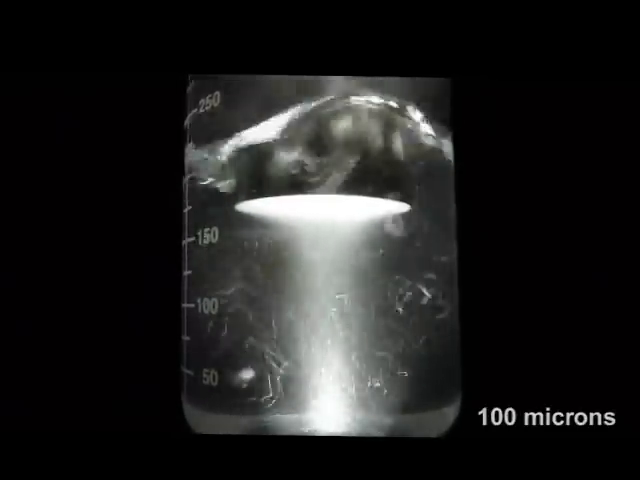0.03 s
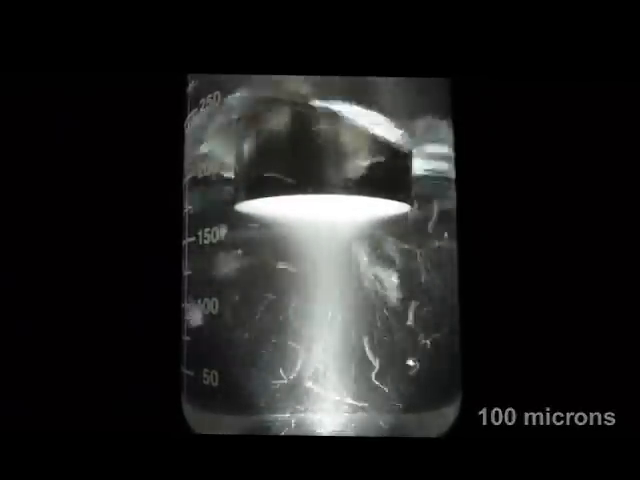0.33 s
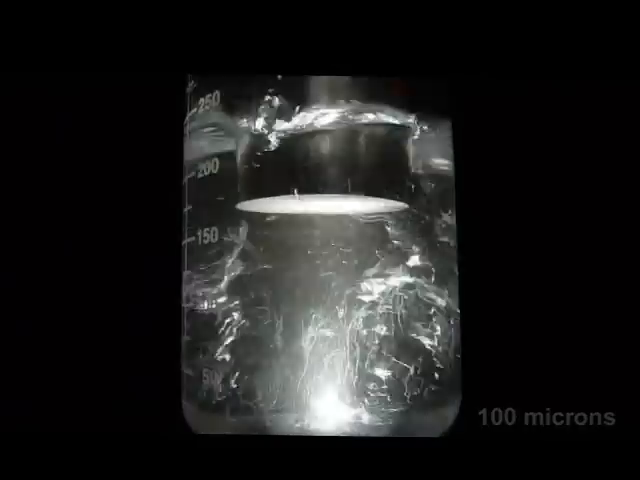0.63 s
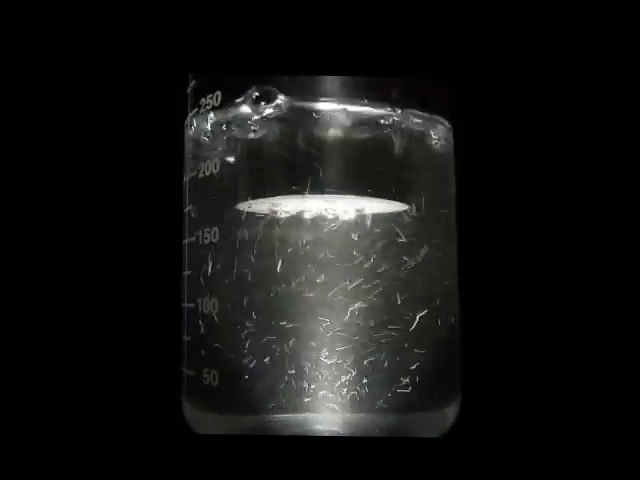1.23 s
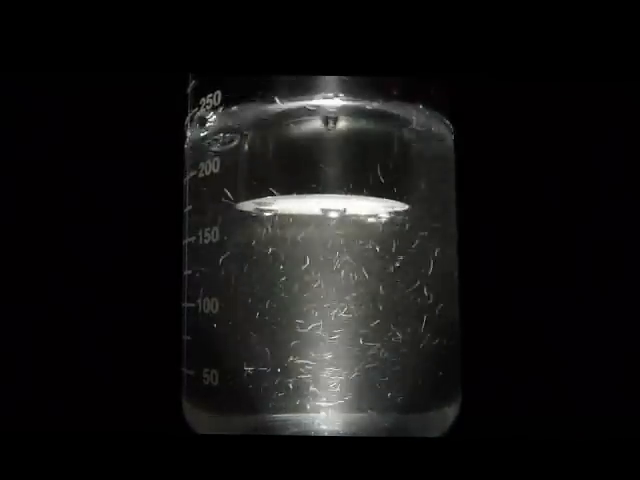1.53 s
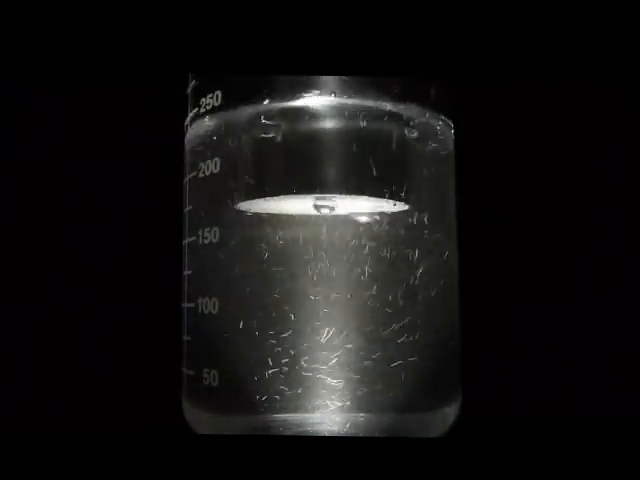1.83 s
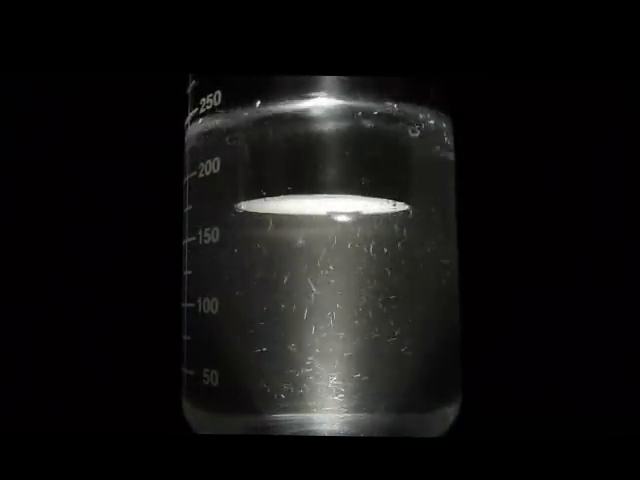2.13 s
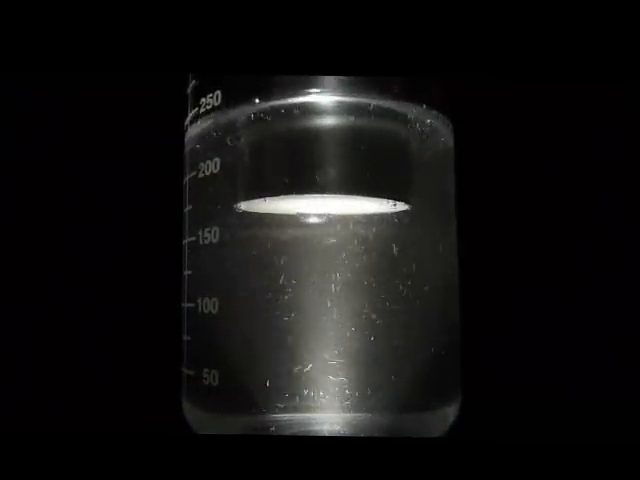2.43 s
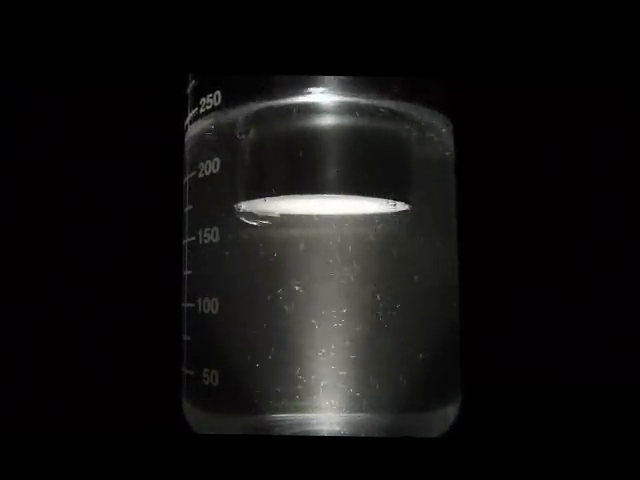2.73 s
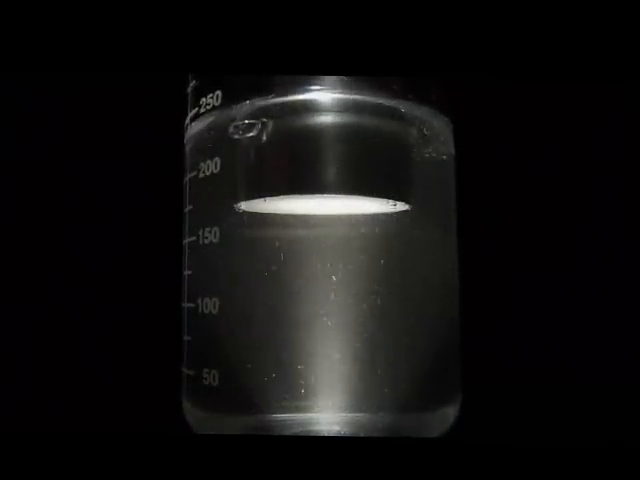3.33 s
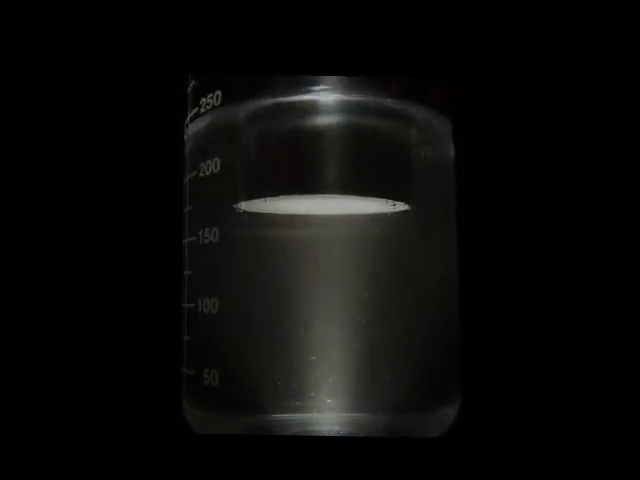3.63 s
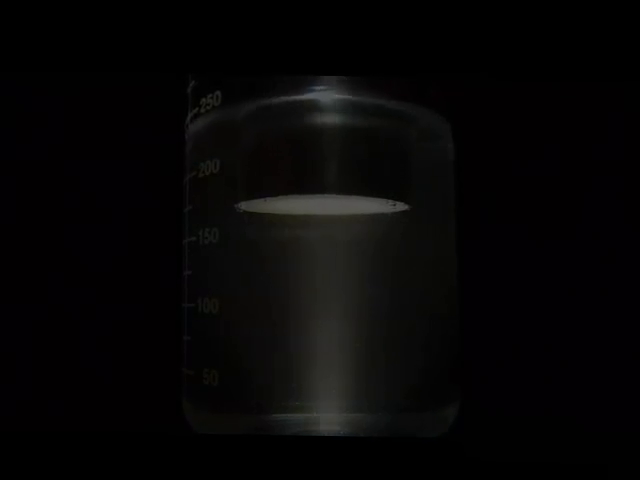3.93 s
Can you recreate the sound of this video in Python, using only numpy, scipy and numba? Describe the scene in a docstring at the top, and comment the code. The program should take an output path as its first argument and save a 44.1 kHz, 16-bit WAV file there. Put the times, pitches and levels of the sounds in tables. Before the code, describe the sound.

A loud hiss of water fizzing in a beaker stops abruptly, leaving low ventilation rumble.

```python
"""An ultrasonic horn shakes water in a glass beaker, so tiny bubbles form and collapse in a loud hiss with two
wandering pitches. The hiss jumps and a faint tick sounds, then the hiss starts to whistle. The horn cuts out
and the beaker rings briefly. The recorder's automatic volume recovers, bringing up the rumble of the room's
ventilation. One sharp click sounds nearby, and at the end the volume steps down. The recorder passes little
above 5 kHz."""
import sys
import numpy as np
from scipy import signal
from scipy.fft import rfft, irfft
from scipy.io import wavfile
from numba import njit

SR = 44100
rng = np.random.default_rng(int(sys.argv[2]) if len(sys.argv) > 2 else 0)


def waveform_to_disk(signal):
    """Save audio, clipped to [-1, 1], as 16-bit WAV at the path in sys.argv[1]."""
    frames = np.transpose(np.atleast_2d(signal))
    scaled = np.clip(frames, -1, 1) * 32767
    samples = np.round(scaled).astype(np.int16)
    wavfile.write(sys.argv[1], SR, samples)


N = 176400
T = np.arange(N) / SR

# The bubble cloud's lower and upper resonance (a pitch it favours): time_s, level_db, pitch_hz
LOW_CLOUD_PATH = [(0, -9.5, 1300), (.05, -13, 1265), (.085, -7, 1274), (.14, -8, 1254), (.168, -3, 1227),
                  (.195, -8.5, 1192), (.28, -7.5, 1180), (.335, -12.5, 1145), (.37, -9.5, 1106),
                  (.395, -11.5, 1150), (.44, -10, 1160), (.47, -6.5, 1077), (.502, -13.5, 1072),
                  (.517, -2, 1400), (.54, -5, 1390), (.58, -15, 1425), (.64, -13.5, 1457), (.67, -10, 1330),
                  (.703, -2, 1289), (.73, -7, 1303)]
HIGH_CLOUD_PATH = [(0, -2.5, 1520), (.04, -7, 1440), (.065, -10.5, 1396), (.087, -6, 1410),
                   (.13, -9.5, 1453), (.175, -6, 1390), (.2, -9, 1400), (.228, -5.5, 1425),
                   (.27, -9.5, 1506), (.31, -9.5, 1540), (.345, -5.5, 1516), (.385, -12.5, 1420),
                   (.428, -8, 1587), (.505, -8, 1566), (.525, -5, 1580), (.538, 0.5, 1667),
                   (.555, -7, 1640), (.635, -10, 1680), (.655, -5, 1430), (.677, -6, 1396),
                   (.703, -7, 1457), (.72, -3, 1640)]
# Loudness of the fizzing bubbles and of the churning water: time_s, level_db
FIZZ_LOUDNESS = [(0, -6), (.25, -9), (.5, -10.5), (.53, -12), (.58, -10), (.64, -11), (.73, -9.5)]
CHURN_LOUDNESS = [(0, -15.5), (.07, -13.5), (.1, -16.5), (.15, -11.5), (.18, -18.5), (.26, -23.5),
                  (.31, -12.5), (.37, -12), (.415, -22.5), (.45, -17), (.5, -13.5), (.55, -17.5),
                  (.61, -19), (.68, -16), (.715, -12.5)]
# Tone colour (how strong each pitch is) of the fizz and of the churning: pitch_hz, level_db
FIZZ_COLOUR = [(100, -38), (600, -11), (1050, -5.5), (1900, -1.5), (2400, 1.5), (3000, -2), (3550, -6),
               (3900, -16), (4600, -18), (5500, -19)]
CHURN_COLOUR = [(30, -14.5), (70, -11.5), (120, -1.5), (220, -1), (380, 0.5), (520, -2), (850, 1.5),
                (1600, -18), (4000, -43)]
# Notes of the filled beaker, each dying by 60 dB in its ring time: pitch_hz, level_db, ring_s
BEAKER_NOTES = [(1032, -6, 0.17), (1082, -5.5, 0.32), (1224, -3, 0.5), (1333, 2.5, 0.4), (1418, .5, 0.3),
                (1466, -8, 0.3), (1545, -5, .22), (1660, -8, .4), (1730, -14, 0.32), (1829, -9, 0.26),
                (2072, -6, 0.28), (2280, -7, .25)]
# Tone colour of the ventilation: pitch_hz, level_db
VENT_COLOUR = [(20, -30), (90, -28), (120, -6), (165, -3.5), (200, -0.5), (230, -7), (275, -5.5),
               (300, -18), (400, -19.5), (540, -21.5), (760, -24.5), (930, -22.5), (1400, -29),
               (1850, -25.5), (3100, -33.5), (4200, -55), (5500, -51)]
# Pitches that the ducts and the room boost: pitch_hz, width_hz, boost_db
DUCT_RESONANCES = [(197.8, 12, 3.5), (318, 12, 6.5), (347.7, 7, 12.5), (455.3, 17, 11.5), (500, 26, 8),
                   (644, 33, 7.5), (693, 20, 7), (800, 18, 4), (848, 55, 10.5), (1166, 42, 7),
                   (1400, 40, 8), (1750, 67, 3.5)]
# Slow drift of the ventilation's loudness: time_s, level_db
VENT_DRIFT = [(0, -4), (1.15, 0), (1.35, 2.4), (1.58, 0.5), (1.72, 1.5), (2, 1.7), (2.3, 1), (2.85, 1),
              (3.1, -1.5), (3.6, 0)]
# Tone colour of the click: pitch_hz, level_db
CLICK_COLOUR = [(60, -23.5), (300, -14), (560, 0.5), (780, -5.5), (1130, 6.5), (1500, 2.5), (1950, -3.5),
                (2300, -3), (3200, -9), (3900, -26.5), (4700, -23), (5600, -28)]
# Notes of the thing that clicks: pitch_hz, level_db, ring_s
CLICK_NOTES = [(503, 1.5, 0.15), (573, 1, 0.052), (1004, -5.5, .05), (1340, -13, .1), (1600, -6.5, .1),
               (2270, -2.5, .1), (2790, -2.5, 0.061)]
# Tone colour of the recorder's own hiss: pitch_hz, level_db
RECORDER_HISS = [(20, -3), (100, 3), (500, -1), (1500, -4.5), (2300, -2), (3200, 2), (4000, -1),
                 (4700, -12), (5500, -18)]
# The recorder's loss of treble: pitch_hz, gain_db
TREBLE_LOSS = [(20, -1.5), (4500, -1), (5000, -6.5), (5300, -16.5), (5550, -26), (5800, -42.5)]

ROOM_ECHO_S = 0.53


def amp(db):
    """Turns decibels into a number to multiply by."""
    return 10 ** (np.asarray(db) / 20)


def unit(x):
    """Scales a sound to an average power of 1."""
    return x / np.sqrt(np.mean(x ** 2) + 1e-20)


def curve(rows, column=1):
    """Joins the points of a time table with straight lines."""
    rows = np.array(rows)
    return np.interp(T, rows[:, 0], rows[:, column])


def colour(x, points, resonances=()):
    """Gives a sound the tone colour in a table, plus any boosted pitches."""
    hz = np.fft.rfftfreq(2 * N, 1 / SR)
    pitch_hz, level_db = np.transpose(points)
    db = np.interp(np.log(hz + 1), np.log(pitch_hz + 1), level_db)
    for centre, width, boost in resonances:
        db = db + boost / (1 + (2 * (hz - centre) / width) ** 2)
    # Fold the filter in time so that it never sounds before its input.
    cepstrum = irfft(np.log(amp(db)))
    cepstrum[1:N] *= 2
    cepstrum[N + 1:] = 0
    return irfft(rfft(x, 2 * N) * np.exp(rfft(cepstrum)))[:N]


def noise(rough=0, clump_hz=100):
    """White noise; more roughness makes it come in random clumps."""
    hz = np.fft.rfftfreq(N, 1 / SR)
    clumps = unit(irfft(rfft(rng.standard_normal(N)) / (1 + (hz / clump_hz) ** 2), N))
    return rng.standard_normal(N) * np.exp(rough * clumps)


def impulse(time_s):
    """A pulse one sample long."""
    return 1. * (np.arange(N) == round(time_s * SR))


def low_pass(x, hz, size=1023):
    """Cuts away the pitches above hz."""
    return signal.oaconvolve(x, signal.firwin(size, hz, window=("kaiser", 9), fs=SR), "same")


@njit
def smooth(x, keep):
    """Blends each sample with the result before it."""
    y = x.copy()
    for i in range(1, len(x)):
        y[i] = keep * y[i - 1] + (1 - keep) * x[i]
    return y


def resonate(x, hz, width_hz):
    """Filters twice to favour a band around a pitch that may move."""
    turn = np.exp(2j * np.pi * np.cumsum(hz * np.ones(N)) / SR)
    keep = np.exp(-np.pi * width_hz / SR)
    for _ in range(2):
        shifted_down = x / turn * (T > 0)
        x = 2 * (turn * smooth(shifted_down, keep)).real
    return unit(x)


def ring(x, notes):
    """An object shaken by x rings at its own notes."""
    ringing = 0
    for hz, db, ring_s in notes:
        sharpness = hz * np.pi * ring_s / np.log(1000)
        ringing += amp(db) * signal.lfilter(*signal.iirpeak(hz, sharpness, SR), x)
    return ringing


def echoes(x, decay_s):
    """A blur of reflections that dies by 60 dB in decay_s."""
    t = T[:SR]
    tail = rng.standard_normal(SR) * amp(-60 * t / decay_s) * (t > .001)
    return signal.fftconvolve(x, tail / np.linalg.norm(tail))[:N]


def bubble_cloud(path):
    """One resonance of the cloud wanders, leaping as the hiss suddenly jumps in pitch and loudness."""
    collapses = noise(rough=0.3, clump_hz=120)
    return resonate(collapses, curve(path, column=2), width_hz=290) * amp(curve(path))


def sizzle(surge_s=.509, hold_s=0.024, decay_s=.045):
    """Smaller bubbles sizzle at a higher, steady pitch, briefly louder as the hiss suddenly jumps."""
    small_bubbles = resonate(noise(rough=.25, clump_hz=120), hz=2500, width_hz=740)
    surge = (T > surge_s) * np.exp(-np.maximum(T - surge_s - hold_s, 0) / decay_s)
    return (amp(-18.5) + amp(-6.5) * surge) * small_bubbles


def fizz():
    """Collapsing bubbles make a broad, bright hiss."""
    return unit(colour(noise(rough=0.22, clump_hz=150), FIZZ_COLOUR)) * amp(curve(FIZZ_LOUDNESS))


def churn():
    """Stirred-up water makes a lower, lumpier noise."""
    return unit(colour(noise(rough=0.28, clump_hz=50), CHURN_COLOUR)) * amp(curve(CHURN_LOUDNESS))


def tick(start_s=.51, above_hz=3000):
    """A single faint, bright tick."""
    return amp(-27) * signal.lfilter(*signal.butter(2, above_hz, "high", fs=SR), impulse(start_s))


def whistle(start_s=0.66, rise_s=0.05, waver_rad=0.59):
    """The cloud locks onto the beaker's three strongest notes and swells into wavering tones."""
    strongest = sorted(BEAKER_NOTES, key=lambda note: -note[1])[:3]
    tones = 0
    for hz, db, _ in strongest:
        waver = unit(low_pass(noise(), hz=60, size=4095))
        tones += amp(db) * np.sin(2 * np.pi * hz * T + waver_rad * waver)
    swell = np.clip((T - start_s) / rise_s, 0, 1)
    return amp(-6) * swell * unit(tones)


def bubbling_beaker(stop_s=0.7234, die_away_s=0.0023):
    """Bubbles shake the glass until the horn stops; the glass and the room ring on briefly."""
    horn_on = np.exp(-np.clip((T - stop_s) / die_away_s, 0, 20))
    cloud = bubble_cloud(LOW_CLOUD_PATH) + bubble_cloud(HIGH_CLOUD_PATH)
    hiss = horn_on * (cloud + sizzle() + fizz() + churn() + whistle())
    return hiss + amp(4) * ring(hiss, BEAKER_NOTES) + amp(-13) * echoes(hiss, ROOM_ECHO_S)


def automatic_volume(x, limit_db=-24.5, sense_s=0.08, recover_db_per_s=14):
    """The recorder turns loud sound down quickly and comes back up slowly."""
    power = x ** 2
    keep = np.exp(-1 / (sense_s * SR))
    sensed = signal.lfilter([1 - keep], [1, -keep], power, zi=[power[:SR // 10].mean()])[0]
    excess_db = 10 * np.log10(sensed + 1e-12) - limit_db
    recovery_db = recover_db_per_s * T
    held_db = np.maximum.accumulate(excess_db + recovery_db) - recovery_db
    return x / np.sqrt(1 + amp(held_db) ** 2)


def ventilation():
    """Moving air rumbles, and the ducts and the room boost certain pitches."""
    return unit(colour(noise(), VENT_COLOUR, DUCT_RESONANCES)) * amp(-29 + curve(VENT_DRIFT))


def click(start_s=2.9443, bounce_s=0.011):
    """A hard snap bounces off a nearby surface, rings, clatters and echoes round the room."""
    pulses = -impulse(start_s) - amp(-17.5) * impulse(start_s + bounce_s)
    snap = colour(pulses, CLICK_COLOUR)
    snap /= np.linalg.norm(snap)
    clatter = echoes(snap, decay_s=0.037)
    near = amp(7) * snap + amp(11.5) * ring(snap, CLICK_NOTES) + amp(5.5) * clatter
    return near + amp(-9.5) * echoes(near, ROOM_ECHO_S)


def stepped_fade(start_s=3.5478, step_s=.04267, step_db=0.49):
    """The volume is turned down in small steps, each making a faint tick."""
    steps = np.ceil(np.maximum(T - start_s, 0) / step_s)
    return amp(-step_db * steps)


def scene():
    """Beaker, ventilation and click reach one microphone."""
    return (bubbling_beaker() + ventilation() + click())[None]


def record(dry):
    """The recorder rides the volume, adds hiss and dulls the treble; the tick and fade go on top."""
    levelled = automatic_volume(dry[0])
    hiss = amp(-52.5) * unit(colour(noise(), RECORDER_HISS))
    dulled = low_pass(colour(levelled + hiss, TREBLE_LOSS), hz=5680)
    faded = (dulled + tick()) * stepped_fade()
    return low_pass(faded, hz=15100, size=127)[None] + .0087  # the wave sits slightly above zero


dry = scene()
out = record(dry)
waveform_to_disk(out)
```